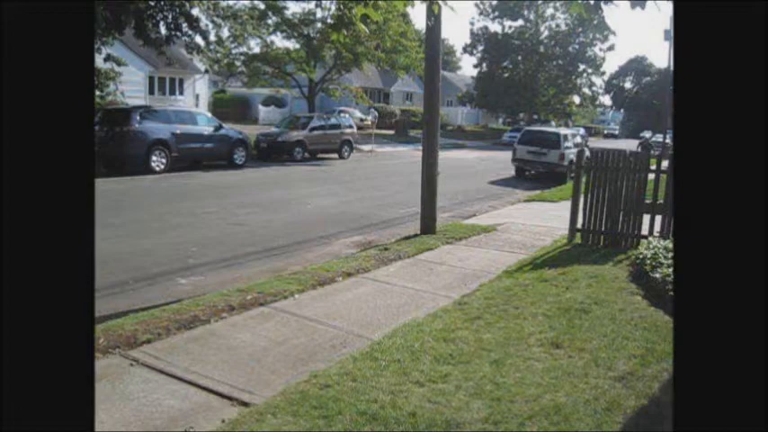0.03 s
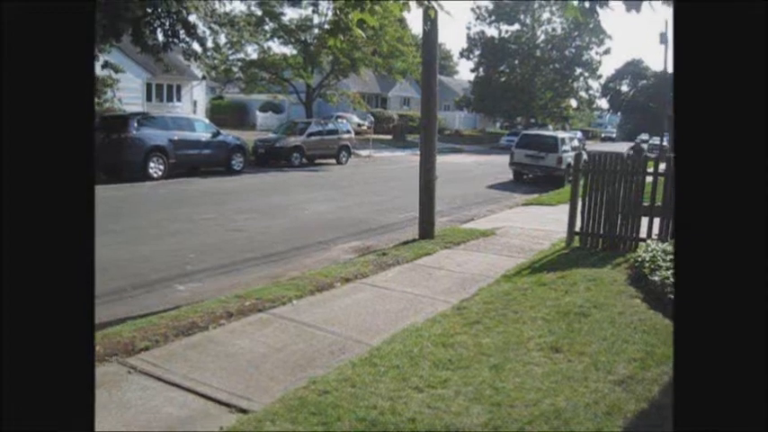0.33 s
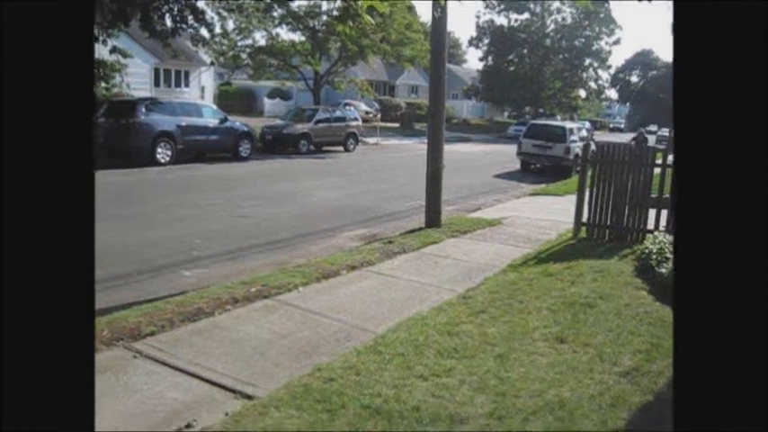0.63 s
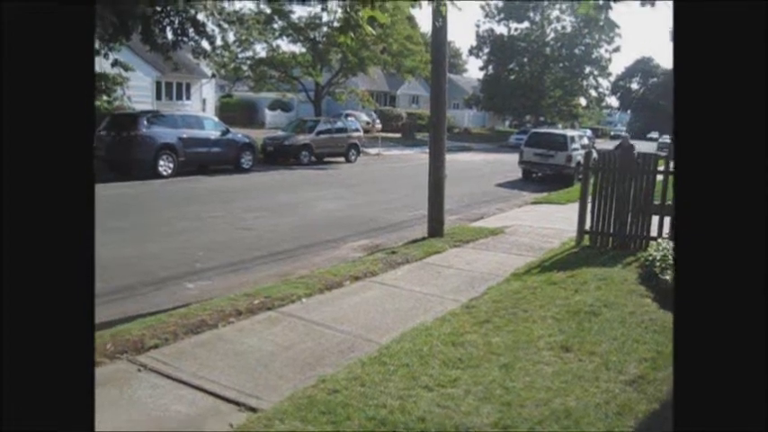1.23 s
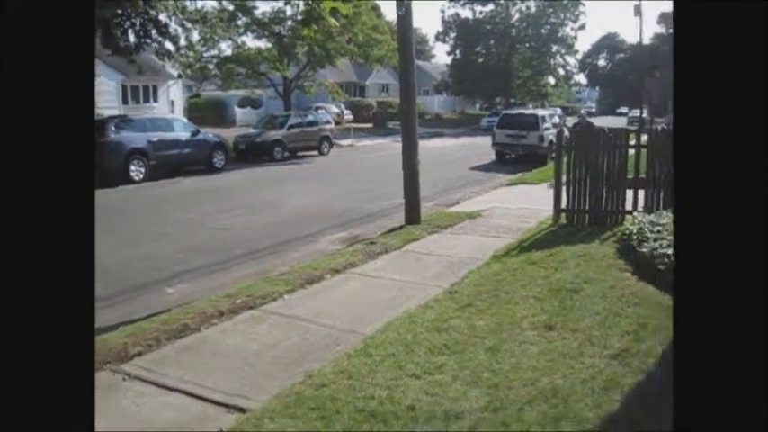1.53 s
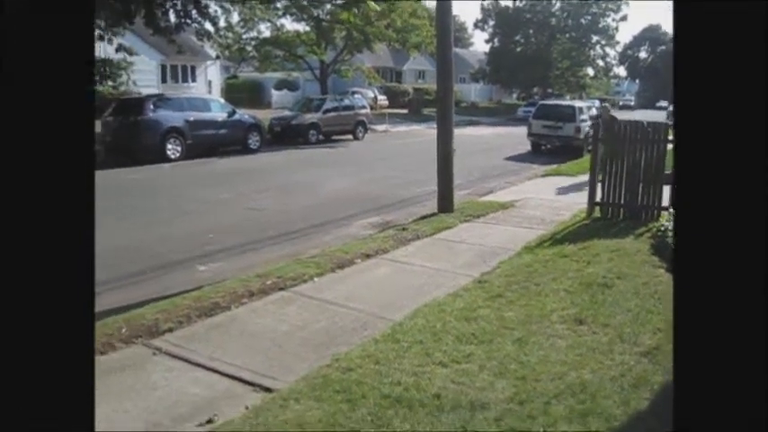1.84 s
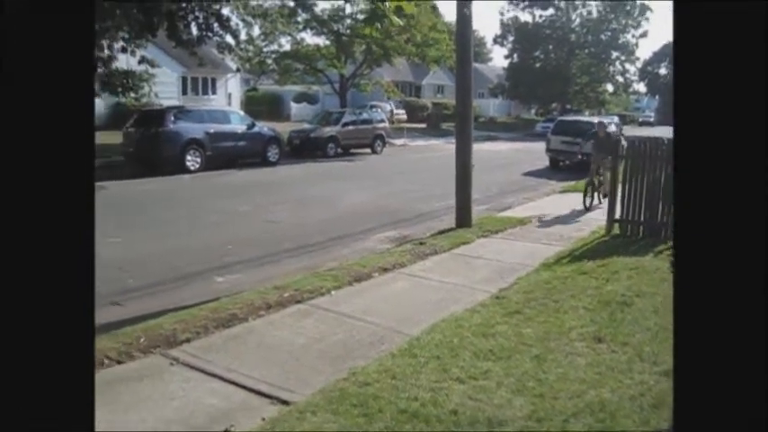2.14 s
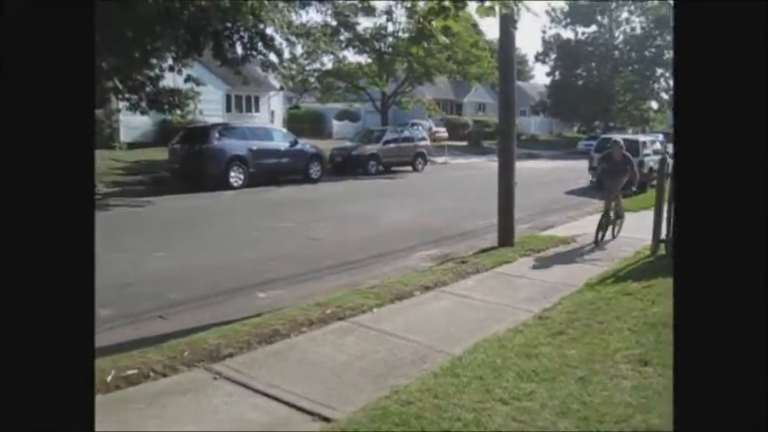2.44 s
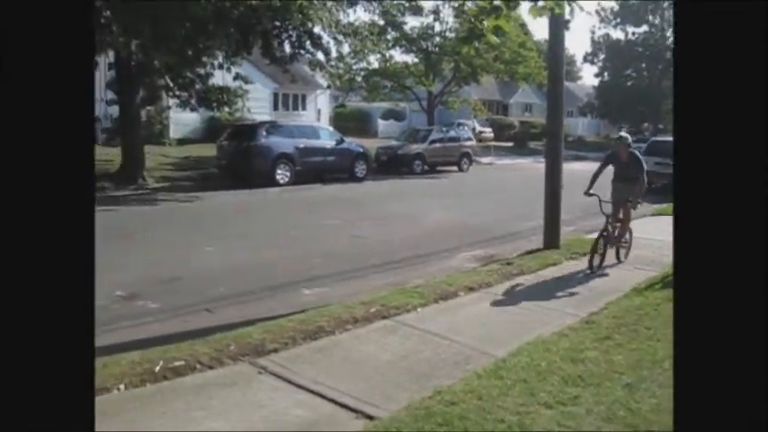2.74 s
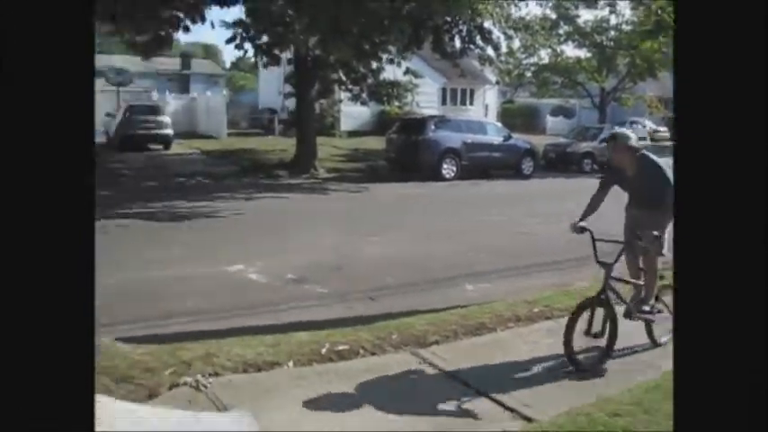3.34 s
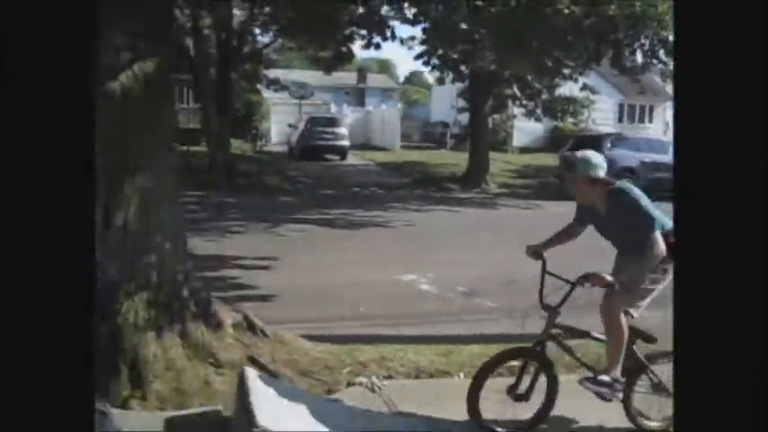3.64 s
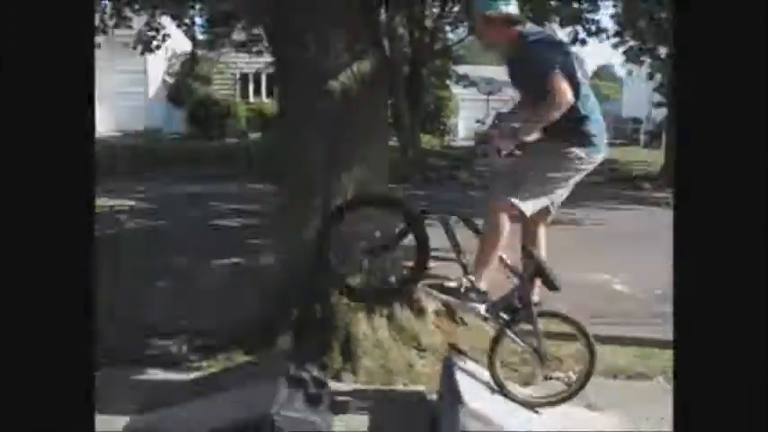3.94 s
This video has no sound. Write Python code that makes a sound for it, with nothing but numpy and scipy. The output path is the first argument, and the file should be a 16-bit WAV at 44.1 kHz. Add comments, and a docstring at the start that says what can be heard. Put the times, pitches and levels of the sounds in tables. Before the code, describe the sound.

Bicycle tyres roll nearer, freewheel buzzing, and hit a hollow ramp with a clattering thump.

```python
"""Light wind and a distant engine drone fill a quiet street; two faint birds call.
A BMX bike coasts up the concrete sidewalk: tyres roar and hiss closer, freewheel pawls buzz.
Both wheels hit a small hollow ramp. Its deck booms, its lip and the bike clatter,
and the tread purrs over it. House fronts echo the hits faintly."""
import sys
import numpy as np
from scipy import signal
from scipy.fft import rfft, irfft
from scipy.io import wavfile
from scipy.ndimage import uniform_filter1d

SR = 44100
rng = np.random.default_rng(int(sys.argv[2]) if len(sys.argv) > 2 else 0)


def transcribe(signal):
    """Save signal, clipped to [-1, 1], as a 16-bit WAV file at the path in sys.argv[1]."""
    frames = np.atleast_2d(signal).T
    limited = np.clip(frames, -1, 1)
    pcm = np.round(limited * 32767).astype(np.int16)
    wavfile.write(sys.argv[1], SR, pcm)


N = 176400

# Street air. Each row: frequency in Hz, relative density in dB.
AIR_SPECTRUM = [(25, -6.5), (55, -3), (100, -3), (135, -2), (190, -13.5), (300, -17.5), (520, -18.5),
                (760, -19), (1100, -16), (1700, -23), (3400, -32.5), (5000, -35), (6500, -44),
                (10000, -43.5), (15500, -69)]
# Wind rumble. Each row: time in seconds, level in dB.
WIND_LEVELS = [(0, -75), (1.4, -58), (2.2, -42), (3.1, -46), (4, -45)]
# Distant engine. Each row: time in seconds, level in dB.
ENGINE_LEVELS = [(0, -46.5), (.6, -45.5), (1.05, -39.5), (1.8, -40.5), (2.3, -41.5), (4, -43)]
# Tyre roar. Each row: frequency in Hz, relative density in dB.
ROAR_SPECTRUM = [(40, -8), (110, -3), (170, -1), (300, 0), (440, -7), (570, -6.5), (820, -3), (1150, -9),
                 (1500, -12.5), (3000, -39)]
# Tyre hiss. Each row: frequency in Hz, relative density in dB.
HISS_SPECTRUM = [(700, -18.5), (1500, -2), (2100, 0.5), (2900, -1), (3800, -2), (4900, -3.5), (6200, -11),
                 (8500, -17), (12000, -27.5), (15500, -56)]
# Rolling tyres. Each row: time in seconds, roar in dB, hiss in dB.
TYRE_LEVELS = [(0, -52, -51), (.6, -45, -51.5), (1.35, -39, -46), (1.55, -40, -46), (1.75, -39, -46),
               (2.22, -40, -46), (2.35, -36, -41), (2.55, -37.5, -41.5), (3.0, -33, -41), (3.2, -33.5, -40),
               (3.5, -32, -38), (3.54, -31.5, -36.5), (3.62, -29.5, -37), (3.7, -30, -34), (3.79, -41, -32),
               (3.85, -35, -43.5), (3.93, -26, -35.5), (4, -49, -51)]
# Grit and bike parts. Each row: start in seconds, level in dB, centre in Hz,
# width as a share of the centre, T60 in seconds.
SNAP_EVENTS = [(0.1428, -23, 3400, 0.28, 0.0047), (1.41, -33.5, 2950, .4, 0.03),
               (1.414, -43, 11000, 0.89, .04), (1.42, -28.5, 3330, 0.39, 0.014),
               (2.6155, -27.5, 6700, 0.63, 0.015), (3.4775, -33, 12090, .5, .006),
               (3.5065, -22, 2600, 0.31, 0.01), (3.8798, -19.5, 6150, 0.35, 0.0054)]
# Far birds. Each row: start in seconds, length in seconds, pitch in Hz, glide in Hz, level in dB.
BIRD_CALLS = [(0.762, .1, 3240, -71, -50), (1.092, 0.06, 4200, 604, -45), (1.135, 0.087, 4650, -300, -50)]
# Freewheel. Each row: time in seconds, ticks per second, level in dB.
PAWL_TICKING = [(2.5, 86, -68), (2.7, 94, -48.5), (2.88, 110, -47.5), (3.07, 98, -47), (3.22, 110, -47),
                (3.45, 98, -43.5), (3.6, 93, -41), (3.69, 128, -35.5), (3.76, 98, -50), (4, 82, -52)]
# Hub ring. Each row: frequency in Hz, relative density in dB.
HUB_SPECTRUM = [(1000, -25), (2300, 4), (3500, 1.5), (4800, 3), (6000, -0.5), (7550, 3), (8300, -7),
                (9300, -6.5), (10200, -9.5), (12800, -14), (13600, -6), (14200, -6), (14800, -21),
                (15500, -23)]
# Ramp lip and bike clacks. Each row: start in seconds, relative level in dB.
CLACK_EVENTS = [(3.7163, -17), (3.722, -5), (3.725, -9.5), (3.7283, -9.5), (3.728, -10), (3.733, -9.5),
                (3.7363, -9.5), (3.7342, -12.5), (3.7405, -22), (3.7482, -15.5), (3.7521, -12.5),
                (3.783, -18.5), (3.833, -23.5), (3.893, -19), (3.9564, -23.5), (3.996, -3.5)]
# Clack timbre. Each row: frequency in Hz, relative density in dB.
CLACK_SPECTRUM = [(300, 7.5), (1400, -3), (2100, -4), (3000, 2), (5100, -0.5), (6400, -5), (8500, -18),
                  (11500, -30), (15500, -68)]
# Frame and lip ring. Each row: frequency in Hz, relative level in dB, T60 in seconds.
METAL_MODES = [(1983, -7, .04), (2033, -2, 0.036), (2390, 5, .04), (2696, -8, .04), (2940, 1, .04),
               (3450, 1.5, .04), (3880, -12, .04), (4960, 0, .03)]
# Wheels on the ramp. Each row: start in seconds, push in dB, contact in ms, knock in dB.
WHEEL_BLOWS = [(3.7184, -12.5, 0.76, -19.5), (3.7231, -4, 2.36, -16.5), (3.733, -4.5, 1.5, -20.5),
               (3.759, -12, 1.84, -25), (3.777, -7, 0.8, -14), (3.787, 1.5, 2.27, -26),
               (3.868, -20, 2.3, -32), (3.884, -8, 2.8, -20.5), (3.888, -7, 4.8, -44),
               (3.915, -8.5, 1.1, -20), (3.933, -9.5, 2.5, -34), (3.937, -9, 2.5, -28),
               (3.9549, -13, 1.9, -26)]
# Ramp deck. Each row: frequency in Hz, relative level in dB, T60 in seconds.
DECK_MODES = [(130, -3, 0.12), (163.4, -6, 0.07), (165.6, 1.5, 0.17), (242.6, -1.5, 0.085),
              (330.4, -2.5, 0.093), (348, -14, 0.053), (432, -3.5, 0.061), (795, -10.5, 0.12),
              (985, -23, .05)]
# Board knock. Each row: frequency in Hz, relative density in dB.
KNOCK_SPECTRUM = [(50, -34), (100, -24), (160, 0), (300, 7), (420, 0), (560, -14.5), (830, 0.5),
                  (1150, -7.5), (1600, -26), (4000, -40)]
# House-front echo. Each row: frequency in Hz, relative density in dB.
ECHO_SPECTRUM = [(100, 5.5), (3000, 2), (12000, -29)]


def undb(db):
    """Decibels to gain."""
    return 10 ** (np.asarray(db) / 20)


def unit(x):
    """Scale to rms 1."""
    return x / np.sqrt(np.mean(x ** 2) + 1e-18)


def curve(table, column=1):
    """One table column, linearly interpolated in time."""
    rows = np.array(table)
    return np.interp(np.arange(N) / SR, rows[:, 0], rows[:, column])


def colour(x, spectrum):
    """Minimum-phase filter; keeps the power of white noise."""
    rows, size = np.array(spectrum), 2 * N
    hz = np.maximum(np.fft.rfftfreq(size, 1 / SR), 1)
    gain = unit(undb(np.interp(np.log(hz), np.log(rows[:, 0]), rows[:, 1])))
    cepstrum = irfft(np.log(gain))
    cepstrum[1:N] *= 2
    cepstrum[N + 1:] = 0
    return irfft(rfft(x, size) * np.exp(rfft(cepstrum)))[:N]


def noise():
    """White noise."""
    return rng.standard_normal(N)


def band(x, hz, width_hz):
    """Band-pass, rms 1."""
    ratio = np.exp(np.clip(width_hz / hz, .02, 2) / 2)
    edges_hz = [hz / ratio, min(hz * ratio, SR * .45)]
    return unit(signal.sosfilt(signal.butter(2, edges_hz, "band", fs=SR, output="sos"), x))


def drift(rate_hz):
    """Smoothed random steps, rms 1."""
    size = int(SR / rate_hz)
    steps = noise()[np.arange(N) // size]
    return unit(uniform_filter1d(uniform_filter1d(steps, size), size))


def decay(start_s, t60_s):
    """Sudden onset, exponential decay."""
    out, first = np.zeros(N), int(np.clip(start_s * SR, 0, N - 1))
    age_s = np.arange(min(N - first, int(2 * t60_s * SR) + 1)) / SR
    out[first:first + len(age_s)] = np.exp(-np.log(1000) * age_s / t60_s)
    return out


def ring(x, response):
    """Convolve with an impulse response."""
    return signal.fftconvolve(x, response)[:N]


def modes(table):
    """Impulse response of damped modes."""
    t = np.arange(N // 8) / SR
    return sum(undb(db - 60 * t / t60_s) * np.sin(2 * np.pi * hz * t) for hz, db, t60_s in table)


def ticks(rate_hz, t60_s, scatter_db):
    """One noise burst of random strength per cycle, rms 1."""
    cycles = np.cumsum(rate_hz) / SR
    strength = undb(scatter_db * noise()[cycles.astype(int)])
    age_s = (cycles % 1) / rate_hz
    return unit(strength * np.exp(-np.log(1000) * age_s / t60_s) * noise())


def street(air_db=-41):
    """Far traffic, light wind and one droning engine."""
    air = colour(noise(), AIR_SPECTRUM) * undb(air_db + 0.22 * drift(rate_hz=5.44))
    wind = band(noise(), hz=51.5, width_hz=46) * undb(curve(WIND_LEVELS))
    engine = band(noise(), hz=116.5, width_hz=36.4) * undb(curve(ENGINE_LEVELS))
    return air + wind + engine


def tyres(grit_per_s=900, grit_spread_db=6.5, grit_db=-7):
    """Rubber roars and hisses on concrete and crunches fine grit."""
    grains = (rng.random(N) < grit_per_s / SR) * np.sign(noise())
    grain_db = grit_spread_db * np.minimum(rng.exponential(size=N), 5)
    grit = undb(grit_db) * unit(grains * undb(grain_db))
    roar = colour(noise(), ROAR_SPECTRUM) * undb(curve(TYRE_LEVELS, 1) + drift(rate_hz=24.8))
    hiss = colour(noise() + grit, HISS_SPECTRUM)
    hiss *= undb(curve(TYRE_LEVELS, 2) + 0.77 * drift(rate_hz=29.69))
    return roar + hiss


def snaps():
    """Grit and bike parts click, each in its own band."""
    out = 0
    for start_s, db, hz, share, t60_s in SNAP_EVENTS:
        envelope = decay(start_s, t60_s)
        rms = np.sqrt(np.mean(envelope ** 2))
        out += undb(db) * rms * band(envelope * noise(), hz, hz * share)
    return out


def birds(rasp_share=.085):
    """Thin gliding calls; fast pitch jitter makes them rasp."""
    t, out = np.arange(N) / SR, 0
    for start_s, length_s, hz, glide_hz, db in BIRD_CALLS:
        progress = np.clip((t - start_s) / length_s, 0, 1)
        pitch_hz = (hz + glide_hz * progress) * (1 + rasp_share * drift(rate_hz=1500))
        envelope = np.sqrt(2 * abs(np.sin(np.pi * progress)))
        out += undb(db) * envelope * np.sin(2 * np.pi * np.cumsum(pitch_hz) / SR)
    return out


def freewheel():
    """Pawls click over the ratchet and ring the hub."""
    clicks = ticks(curve(PAWL_TICKING, 1), t60_s=.011, scatter_db=1.5)
    ticking = np.arange(N) / SR > PAWL_TICKING[0][0]
    return colour(clicks, HUB_SPECTRUM) * undb(curve(PAWL_TICKING, 2)) * ticking


def clatter(rattle_db=-2.5, contact_db=12, tail_db=-27, metal_db=-10):
    """The ramp lip slaps the pavement and the bike rattles: cracks, short tails, a metal ring."""
    cracks, tail_power = np.zeros(N), 0
    rattle = noise()
    for start_s, db in CLACK_EVENTS:
        cracks += undb(db + rattle_db) * decay(start_s, t60_s=0.0085) * rattle
        cracks[int(start_s * SR)] += undb(db + contact_db) * rng.choice([-1, 1])
        tail_power += (undb(db + tail_db) * decay(start_s, t60_s=0.067)) ** 2
    tails = noise() * np.sqrt(tail_power)
    metal = modes(METAL_MODES)
    ringing = undb(metal_db) * ring(cracks, metal / np.linalg.norm(metal))
    return colour(cracks + tails, CLACK_SPECTRUM) + ringing


def ramp(deck_db=-6.5, low_cut_hz=92):
    """Each wheel blow is a half-sine push: deck modes boom, boards knock."""
    t, push, knock = np.arange(N) / SR, 0, 0
    for start_s, push_db, contact_ms, knock_db in WHEEL_BLOWS:
        pulse = np.sin(np.pi * np.clip((t - start_s) * 1000 / contact_ms, 0, 1))
        push += undb(push_db) * pulse / pulse.sum()
        knock += undb(knock_db) * decay(start_s, t60_s=0.086)
    # The deck radiates little deep bass.
    low_cut = signal.butter(2, low_cut_hz, "high", fs=SR, output="sos")
    deck = signal.sosfilt(low_cut, modes(DECK_MODES))
    return undb(deck_db) * ring(push, deck) + colour(knock * noise(), KNOCK_SPECTRUM)


def tread(start_s=3.795, end_s=3.85, rate_hz=322.5, level_db=-37):
    """Tread blocks tap the smooth deck in quick succession."""
    t = np.arange(N) / SR
    taps = ticks(np.full(N, rate_hz), t60_s=.003, scatter_db=2.5)
    on_deck = (t > start_s) & (t < end_s)
    return colour(taps * on_deck, CLACK_SPECTRUM) * undb(level_db)


def house_echo(x, delay_s=0.026, t60_s=0.62, level_db=-21):
    """House fronts return a faint, diffuse tail."""
    response = colour(noise() * decay(delay_s, t60_s), ECHO_SPECTRUM)
    return undb(level_db) * ring(x, response / np.linalg.norm(response))


def scene():
    """Bike and ramp over the street, mono; only the hits echo."""
    hits = ramp() + clatter() + snaps()
    return (hits + house_echo(hits) + tread() + tyres() + freewheel() + street() + birds())[None]


def record(dry):
    """Brief opening silence, clipped peaks, steep treble cut."""
    start_s, top_hz = 0.072, 15750
    clipped = np.clip(dry, -1, 1) * (np.arange(N) / SR >= start_s)
    return signal.sosfilt(signal.ellip(10, .2, 80, top_hz, fs=SR, output="sos"), clipped)


dry = scene()
out = record(dry)
transcribe(out)
```